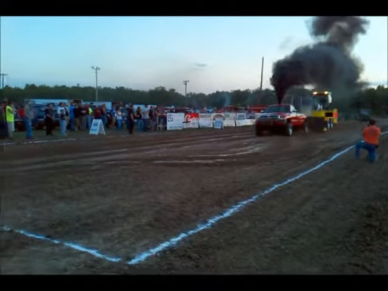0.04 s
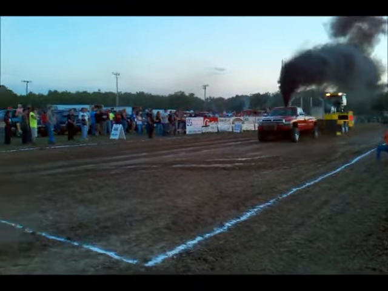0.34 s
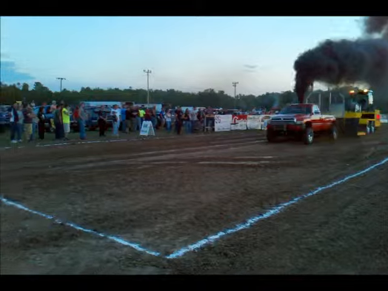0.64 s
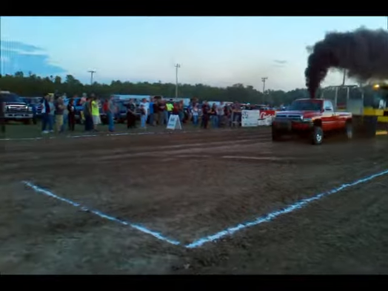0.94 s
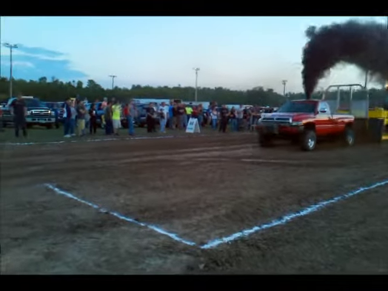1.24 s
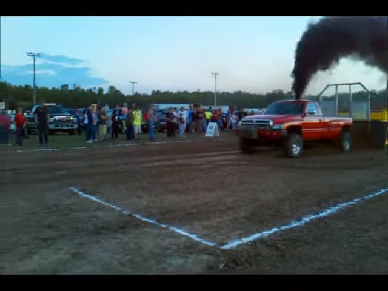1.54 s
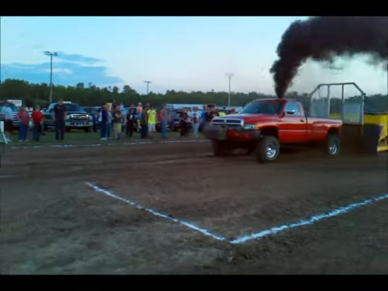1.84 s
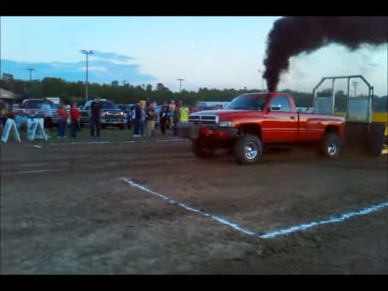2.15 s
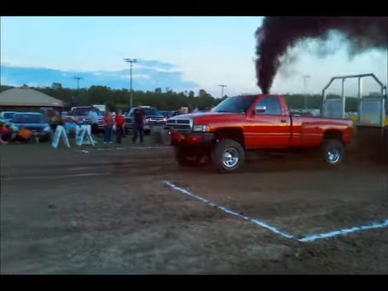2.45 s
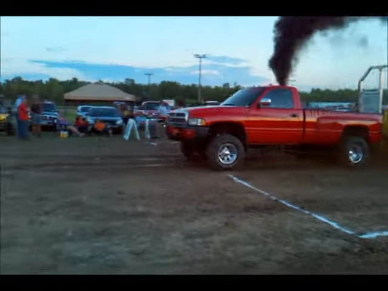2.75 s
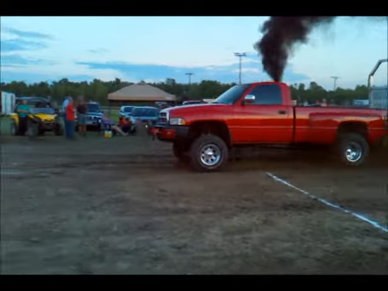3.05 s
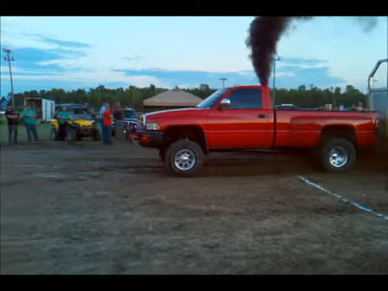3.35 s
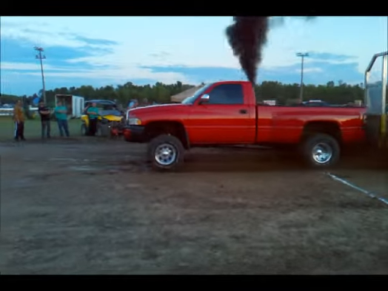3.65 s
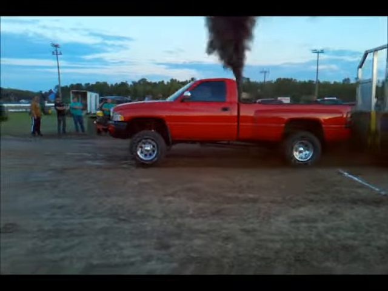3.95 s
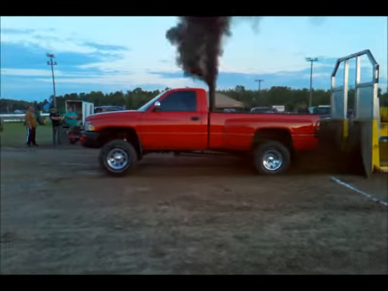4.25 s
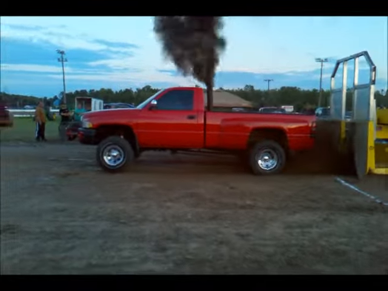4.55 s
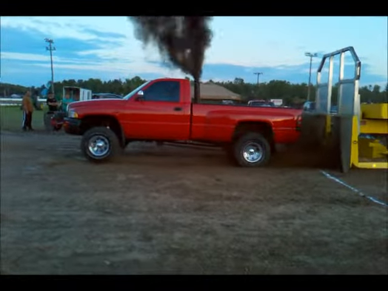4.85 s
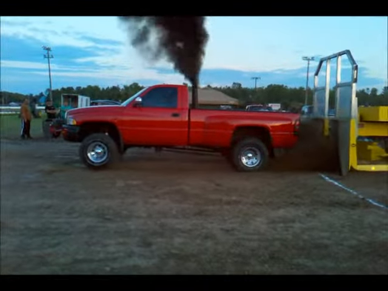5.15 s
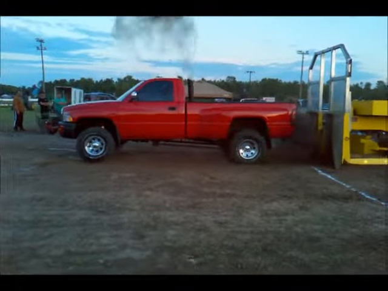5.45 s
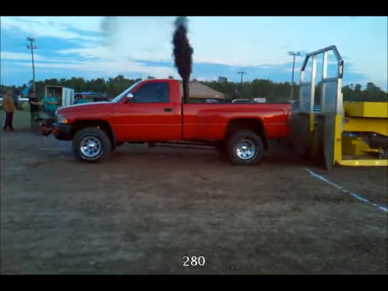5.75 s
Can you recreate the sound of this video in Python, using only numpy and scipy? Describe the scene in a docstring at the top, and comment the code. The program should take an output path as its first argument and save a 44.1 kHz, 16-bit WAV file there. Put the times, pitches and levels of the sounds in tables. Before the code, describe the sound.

A diesel pickup drags a sled at full throttle on an open dirt track, its exhaust droning, barking and hissing under a very high turbo whistle. It grows somewhat louder as it nears the microphone, the revs sagging in repeated dips. Near the end the throttle shuts, the whistle falls, the turbo gives a few quick chuffs, and the engine picks up again.

```python
"""A droning, barking, hissing exhaust under a very high turbo whistle: a six-cylinder diesel pickup
drags a sled past at full throttle on an open dirt track. Firings ring the stack and throw out puffs
of gas; the revs sag as the tyres bite. Near the end the driver lifts: the turbo winds down, its
compressor surges in chuffs, then the engine picks up. The two channels have opposite polarity."""
import sys
import numpy as np
from scipy import signal
from scipy.fft import rfft, irfft
from scipy.io import wavfile
from scipy.ndimage import uniform_filter1d

SR = 44100
rng = np.random.default_rng(int(sys.argv[2]) if len(sys.argv) > 2 else 0)


def master(y):
    """Save y as 16-bit WAV."""
    cut = np.clip(np.atleast_2d(y).T, -1, 1)
    pcm = np.round(cut * 32767)  # scale
    wavfile.write(sys.argv[1], SR, pcm.astype(np.int16))


N = 256220
T = np.arange(N) / SR

LIFT_S, BACK_ON_S, SHUT_S, OPEN_S = 5.224, 5.676, .024, .0028  # throttle: off, on, travel times
FULL_BOOST_HZ, SPOOL_DOWN_S, TURBO_LAG_S = 12520, .638, .049
STACK_HEIGHT_M, EAR_HEIGHT_M = 2.19, 1.484

# Engine speed before bites and lift: time_s, firing_hz
REVS = [(0, 204), (.29, 205), (.47, 193), (.93, 198), (1.07, 190), (1.55, 192.5), (1.85, 192.3), (2.1, 184),
        (2.75, 181.8), (3.2, 176.4), (3.85, 173.5), (4.5, 184.6), (4.72, 192.7), (5.04, 197.5), (5.22, 193)]
# Tyre bites as the truck hops: centre_s, dip_hz, half_length_s
TYRE_BITES = [(.16, 6, .1), (.85, 4.5, .065), (1.72, 9.3, .13), (1.934, 6.4, .1), (2.32, 10.2, .133),
              (2.607, 12.5, .15), (2.937, 11.4, .13), (3.358, 20, .15), (3.685, 14.5, .18),
              (4.012, 18.5, .135), (4.339, 17.3, .124), (4.609, 11.8, .07), (4.879, 12.7, .065)]
# Turbo speed before sag and spool-down: time_s, blade_hz
TURBO_SPEED = [(0, 12850), (.5, 12730), (1.0, 12760), (1.8, 12750), (2.4, 12590), (3.2, 12530),
               (3.45, 12390), (3.75, 12370), (4.2, 12490), (4.75, 12720), (5.22, 12590)]
# Cylinders in firing order, at a limp of 1: strength_db, late_periods
CYLINDERS = [(.3, 0), (-4.4, 0), (-12.5, .07), (0, 0), (-4, 0), (-12, .07)]
# Depth of the cylinders' unevenness: time_s, limp_ratio
LIMP = [(0, 1.1), (1.5, 1.2), (1.7, .55), (2.15, .5), (2.3, .85), (4.3, .85), (4.5, .7), (4.75, .9)]
# Truck range, for the ground echo: time_s, distance_m
DISTANCE = [(0, 37.4), (.8, 26), (1.3, 17.4), (1.7, 16.2), (2.2, 13.4), (2.8, 11.4), (3.3, 6.73),
            (3.7, 6.6), (4.3, 7.3), (5.81, 6.4)]
# Left-right likeness of turbulence: frequency_hz, correlation
LIKENESS = [(100, 0.72), (1300, 0.96), (2500, 1), (4000, 1), (6000, 0.36), (13000, 0.76)]
# Sinking band of hiss: time_s, centre_hz, level_db
RASP = [(0, 3500, -45), (.4, 3386, -34), (.9, 3080, -35), (1.2, 2816, -31.5), (1.7, 2400, -44),
        (2.5, 2030, -77)]
# Rushing air, base level: time_s, level_db
HISS_LEVEL = [(0, -38.5), (.6, -36), (.82, -31.5), (1.35, -39), (3, -36.5), (3.9, -32.5), (4.45, -33.5),
              (5.2, -34.5), (5.6, -24)]
# Rushing air, spectrum: frequency_hz, density_db
HISS_SPECTRUM = [(1500, -9), (3300, 6.5), (4700, -4), (7200, 3), (8600, 2.5), (10500, -3), (14000, -4.5)]
# Exhaust gas, spectrum: frequency_hz, density_db
ROAR_SPECTRUM = [(40, -41), (90, -5), (150, 3), (260, 12), (480, 8.5), (750, 6), (1000, 3.5), (1350, -1),
                 (1900, 0.5), (2300, -1.5), (3200, -15.5), (4500, -11), (9000, -19.5)]
# Engine load, base level of bark and roar: time_s, level_db
LOAD = [(0, -26.5), (.5, -23.5), (1.0, -24), (1.15, -22), (1.55, -23.5), (2.0, -21), (2.35, -21.5),
        (2.95, -22.5), (3.35, -20.5), (4.1, -18), (4.55, -17.5), (5.2, -20.5), (5.72, -20)]
# Brief exhaust swells: centre_s, extra_db
HARD_BARKS = [(1.18, 2.5), (1.76, 4.5), (2.15, 2), (2.5, 2), (2.79, 5.5), (4.21, 0), (4.48, 0.5), (4.88, 4)]
# Compressor surges: centre_s, hoot_db, hoot_hz, hoot_sigma_s, relative_rush_db
SURGES = [(5.362, -19, 1840, 0.012, -33.5), (5.399, -27, 1690, 0.008, -48), (5.494, -30, 1390, 0.016, -39),
          (5.618, -39, 1080, 0.02, -41)]
# Turbo whistle, base level: time_s, level_db
WHISTLE_LEVEL = [(0, -29), (1.3, -30), (2.8, -26.5), (4, -29), (5.2, -31)]
# Main stack resonance, sinking as the truck draws level: time_s, centre_hz
THROAT = [(0, 730), (1.0, 770), (1.4, 840), (1.9, 735), (2.6, 730), (3.5, 678), (4.5, 744), (5.2, 680)]
# Weaker stack resonances: centre_hz, width_hz, gain_db
STACK_MODES = [(314, 114, -2), (561.4, 137, 2), (1090, 35, -8), (1398, 203, -21), (2030, 1700, -27.5)]
# Drone at the firing rate, base level: time_s, level_db
DRONE_LEVEL = [(0, -15), (.17, -21), (.33, -12), (.53, -20), (.64, -12), (.76, -17.5), (1.2, -11),
               (2.08, -10.5), (2.35, -15), (2.75, -14), (3.02, -11.5), (3.24, -12.5), (3.34, -20),
               (3.55, -16.5), (4.42, -15.5), (4.75, -13), (5.22, -12), (5.34, -18), (5.45, -7), (5.6, -16),
               (5.8, -14)]
# Octave of the drone, base level: time_s, level_db
OCTAVE_LEVEL = [(0, -47), (.95, -30), (1.25, -35), (1.85, -35.5), (2.05, -29.5), (2.8, -22), (3.2, -24),
                (3.35, -27), (3.7, -20.5), (3.95, -25.5), (4.5, -31), (5.2, -49), (5.27, -17), (5.45, -37),
                (5.72, -23.5)]
# Right channel against left: frequency_hz, gain_db
RIGHT_COLOUR = [(60, -10), (110, 0.5), (180, -4.5), (400, -2.5), (750, -2.4), (1400, -1), (13000, 0.6)]


def from_db(db):
    return 10 ** (np.asarray(db) / 20)


def rms_one(x):
    return x / np.sqrt(np.mean(np.abs(x) ** 2) + 1e-20)


def ramp(start_s, length_s):
    return np.clip((T - start_s) / length_s, 0, 1)


def bell(x, sigma):
    return np.exp(-.5 * (x / sigma) ** 2)


def in_time(rows):
    """Each value column of a time table, per sample."""
    time_s, *columns = np.transpose(rows)
    return [np.interp(T, time_s, column) for column in columns]


def at_bins(rows):
    """A frequency table, per FFT bin."""
    hz, value = np.transpose(rows)
    return np.interp(np.log(np.arange(N // 2 + 1) * SR / N + 1), np.log(hz), value)


def drift(rate_hz):
    """Smooth random motion, rms 1."""
    pole = np.exp(-16 * np.pi * rate_hz / SR)  # runs at SR / 8
    slow = signal.lfilter([1], [1, -2 * pole, pole ** 2], rng.standard_normal(N // 8 + 4002))[4000:]
    return np.interp(np.arange(N) / 8, np.arange(len(slow)), rms_one(slow))


def scatter(rate_hz):
    """Random amplitude and phase; spreads a tone into a band."""
    return drift(rate_hz) + 1j * drift(rate_hz)


def phasor(hz):
    return np.exp(2j * np.pi * np.cumsum(hz) / SR)


def resonance(x, hz, width_hz):
    """Two poles, peak gain 1."""
    r = np.exp(-np.pi * width_hz / SR)
    poles = [1, -2 * r * np.cos(2 * np.pi * hz / SR), r * r]
    return signal.lfilter(np.array([1, 0, -1]) * (1 - r * r) / 2, poles, x)


def sweeping_resonance(x, hz, width_hz):
    """Moving centre, peak gain 1."""
    r, carrier = np.exp(-np.pi * width_hz / SR), phasor(hz)
    return 2 * np.real(carrier * signal.lfilter([1 - r], [1, -r], x / carrier))


def throttle_shut():
    """0 on the throttle, 1 off it."""
    return ramp(LIFT_S, SHUT_S) - ramp(BACK_ON_S, OPEN_S)


def coasted_s():
    """Time off the throttle so far."""
    return np.clip(T, LIFT_S, BACK_ON_S) - LIFT_S


def tyre_drag_hz():
    """Firing rate lost to tyre bites."""
    return sum(dip_hz * np.maximum(0, 1 - np.abs(T - s) / half_s) for s, dip_hz, half_s in TYRE_BITES)


def firing_hz(coast_hz_per_s=98, pickup_hz_per_s=380):
    """Revs dip at each bite. On the lift the sled jerks them down; they fall until the throttle opens."""
    jolt_hz = 13 * ramp(LIFT_S + .031, .0592)
    pickup_hz = pickup_hz_per_s * np.maximum(0, T - BACK_ON_S)
    return in_time(REVS)[0] - tyre_drag_hz() - jolt_hz - coast_hz_per_s * coasted_s() + pickup_hz


def blade_hz():
    """The turbo sags just after each bite; off the throttle, drag slows it as speed squared."""
    pole = np.exp(-1 / (TURBO_LAG_S * SR))
    sag_hz = 12 * signal.lfilter([1 - pole], [1, -pole], tyre_drag_hz())
    return (in_time(TURBO_SPEED)[0] - sag_hz) / (1 + coasted_s() / SPOOL_DOWN_S)


def effort_db(dip_db_per_hz, shut_db, boost_slope, waver_db):
    """Level change with tyre bites, throttle and turbo speed, plus a random waver."""
    boost_db = 20 * np.log10(blade_hz() / FULL_BOOST_HZ)
    engine_db = dip_db_per_hz * tyre_drag_hz() + shut_db * throttle_shut() + boost_slope * boost_db
    return engine_db + waver_db * drift(rate_hz=7.9)


def hard_barks_db():
    """Brief swells of the exhaust."""
    return sum(db * bell(T - s, .04) for s, db in HARD_BARKS)


def firings(cycles, scatter_db=1, jitter_s=.00004):
    """One click per firing; the cylinders limp strong, middling, weak."""
    number = np.arange(1, int(cycles[-1]))
    strength_db, late_periods = np.array(CYLINDERS)[number % len(CYLINDERS)].T
    limp = np.interp(number, cycles, in_time(LIMP)[0])
    time_noise, level_noise = rng.standard_normal((2000, 2))[number].T
    fire_s = np.interp(number + limp * late_periods, cycles, T) + jitter_s * time_noise
    samples = np.clip(np.round(fire_s * SR).astype(int), 0, N - 1)
    clicks = np.zeros(N)
    clicks[samples] = from_db(limp * strength_db + scatter_db * level_noise)
    return clicks


def pipe_echo(x, delay_s=.0024, gain=.35):
    """Each pulse returns once from the far end of the pipe."""
    return x + gain * np.interp(T - delay_s, T, x)


def ground_echo(x, bounce, dull_hz):
    """The dirt returns a dull echo, later as the truck nears, so its notches sweep down."""
    distance_m, = in_time(DISTANCE)
    direct_m = np.hypot(distance_m, STACK_HEIGHT_M - EAR_HEIGHT_M)
    bounced_m = np.hypot(distance_m, STACK_HEIGHT_M + EAR_HEIGHT_M)
    delay_s = (bounced_m - direct_m) / 343
    dull = signal.sosfilt(signal.butter(1, dull_hz, fs=SR, output="sos"), x)
    return x + bounce * np.array([np.interp(T - delay_s, T, side) for side in np.atleast_2d(dull)])


def turbulence(spectrum, gate):
    """Stereo noise, gated then coloured; rms 1."""
    common, apart = rfft(rng.standard_normal((2, N)) * gate)
    alike = np.clip(at_bins(LIKENESS), 0, 1)
    pair = np.sqrt(1 + alike) * common + np.sqrt(1 - alike) * apart * np.array([[1], [-1]])
    return rms_one(irfft(pair * from_db(at_bins(spectrum)), N))


def approach_rasp(spread_hz=160):
    """A band of hiss sinks and fades as the truck nears."""
    centre_hz, level_db = in_time(RASP)
    return from_db(level_db) * np.real(scatter(spread_hz) * phasor(centre_hz))


def chuffs(half_length_s=.026):
    """Envelope of the air rushing out at each surge."""
    return sum(from_db(db) * np.exp(-.5 * ((T - s) / half_length_s) ** 4) for s, *_, db in SURGES)


def air_hiss(cycles, throb=.079, trim_db=9.5):
    """The jet hisses, throbbing slightly with the firings and swelling at each surge."""
    level_db = in_time(HISS_LEVEL)[0]
    level_db += effort_db(dip_db_per_hz=-.19, shut_db=-8, boost_slope=4.3, waver_db=1.6)
    gate = 1 + throb * np.cos(2 * np.pi * (cycles - .2))
    return (from_db(level_db) + chuffs()) * from_db(trim_db) * turbulence(HISS_SPECTRUM, gate)


def gas_roar(clicks, puff_rise_s=.0005, trim_db=-2, chuff_db=-4):
    """Each firing throws a puff of turbulent gas from the stack, over a steadier flow."""
    level_db = in_time(LOAD)[0] + trim_db + .5 * hard_barks_db()
    level_db += effort_db(dip_db_per_hz=-.0064, shut_db=-5.8, boost_slope=1.8, waver_db=.84)
    pole = np.exp(-1 / (puff_rise_s * SR))
    puffs = signal.lfilter([1], [1, -2 * pole, pole ** 2], clicks)
    puff_share = .33 * (1 - throttle_shut())
    gate = 1 - puff_share + puff_share * rms_one(pipe_echo(puffs))
    gas = ground_echo(turbulence(ROAR_SPECTRUM, gate), bounce=.45, dull_hz=900)
    return (from_db(level_db) + from_db(chuff_db) * chuffs()) * rms_one(gas)


def compressor_surges(hoot_width_hz=130, rasp_width_hz=320, flutter_hz=300):
    """Air spills back through the compressor in raspy hoots, each lower than the last."""
    def band(hz, width_hz):
        return rms_one(resonance(resonance(rng.standard_normal(N), hz, width_hz), hz, width_hz))

    out = np.zeros(N)
    for centre_s, db, hz, sigma_s, _ in SURGES:
        hoot = band(hz, hoot_width_hz)
        rasp = .75 * band(hz, rasp_width_hz) * rms_one(np.abs(drift(flutter_hz)))
        out += from_db(db) * bell(T - centre_s, sigma_s) * rms_one(hoot + rasp)
    return out


def turbo_whistle(flutter_hz=24.4, skirt_hz=613, wander_hz=7.2, fray_db=7, flare_db=17, trim_db=7):
    """Hot gas scatters the blade tone into a fluttering line with a noisy skirt; it frays on slowing."""
    level_db = in_time(WHISTLE_LEVEL)[0] + trim_db
    level_db += effort_db(dip_db_per_hz=0, shut_db=3.2, boost_slope=2.05, waver_db=1.3)
    fall_hz_per_s = uniform_filter1d(-np.gradient(blade_hz()) * SR, size=2000)
    slowing = np.clip(fall_hz_per_s / 14000, 0, 1)
    flutter, skirt, stereo = from_db(-3), from_db(-5 + fray_db * slowing), from_db(-12)
    haze = flutter * scatter(flutter_hz) + skirt * scatter(skirt_hz)
    haze = haze + stereo * np.array([scatter(skirt_hz), scatter(skirt_hz)])
    flare = from_db(flare_db) * bell(blade_hz() - 8142, 22)  # brief, as the pitch falls past 8142 Hz
    tone = np.real((1 + flare + haze) * phasor(blade_hz() + wander_hz * drift(113)))
    return from_db(level_db) * tone / np.sqrt(.5 + flutter ** 2 + skirt ** 2 + stereo ** 2)


def exhaust_drone(cycles, boom_hz=316, boom_half_width_hz=11, boom_db=12, octave_trim_db=3.5):
    """Tones at the firing rate and its octave; the octave booms as revs dip toward a pipe resonance."""
    drone_db = in_time(DRONE_LEVEL)[0]
    drone_db += effort_db(dip_db_per_hz=-.13, shut_db=-9.3, boost_slope=1.14, waver_db=2.26)
    octave_db = in_time(OCTAVE_LEVEL)[0] + octave_trim_db
    octave_db += effort_db(dip_db_per_hz=-.23, shut_db=-8.9, boost_slope=2.4, waver_db=2.5)
    detuning = (2 * firing_hz() - boom_hz) / boom_half_width_hz
    octave_db += boom_db * (1 - throttle_shut()) / (1 + detuning ** 2)
    drone = from_db(drone_db) * np.cos(2 * np.pi * (cycles - .14))
    octave = from_db(octave_db) * np.cos(4 * np.pi * (cycles - .16))
    return np.sqrt(2) * (drone + octave)


def exhaust_bark(clicks):
    """Firings ring the stack; the ringing is evened out, then the load sets its level."""
    level_db = in_time(LOAD)[0] + hard_barks_db()
    level_db += effort_db(dip_db_per_hz=-.21, shut_db=-20, boost_slope=1, waver_db=.4)
    throat_hz, = in_time(THROAT)
    rings = -sweeping_resonance(clicks, throat_hz, width_hz=250)
    for hz, width_hz, db in STACK_MODES:
        polarity = 1 if hz < throat_hz[0] else -1
        rings += polarity * from_db(db) * resonance(clicks, hz, width_hz)
    rings = signal.sosfilt(signal.butter(2, [220, 2400], "band", fs=SR, output="sos"), rings)
    rings = ground_echo(pipe_echo(rings), bounce=.4, dull_hz=2000)
    return from_db(level_db) * rings / np.sqrt(uniform_filter1d(rings ** 2, size=4000) + 1e-12)


def scene():
    """All sources sit on the truck; one firing count times the exhaust."""
    rate_hz = uniform_filter1d(firing_hz(), size=1200) * (1 + .0015 * drift(22))
    cycles = np.cumsum(rate_hz) / SR
    clicks = firings(cycles)
    clicks[round((BACK_ON_S + OPEN_S) * SR)] += 1  # extra bang as the throttle reopens
    whistle = turbo_whistle()
    flow = gas_roar(clicks) + air_hiss(cycles)
    exhaust = exhaust_drone(cycles) + exhaust_bark(clicks)
    return compressor_surges() + approach_rasp() + flow + whistle + exhaust


def record(dry, right_lag_s=15 / SR, ceiling=.85, cutoff_hz=14100):
    """Right channel late, inverted and thinner in the bass; peaks rounded, top cut."""
    left, right = dry
    right = np.interp(T - right_lag_s, T, right)
    right = -irfft(rfft(right) * from_db(at_bins(RIGHT_COLOUR)), N)
    pair = np.array([left, right])
    rounded = pair / (1 + (pair / ceiling) ** 8) ** (1 / 8)
    return signal.sosfilt(signal.ellip(12, .2, 90, cutoff_hz, fs=SR, output="sos"), rounded)


dry = scene()
out = record(dry)
master(out)
```